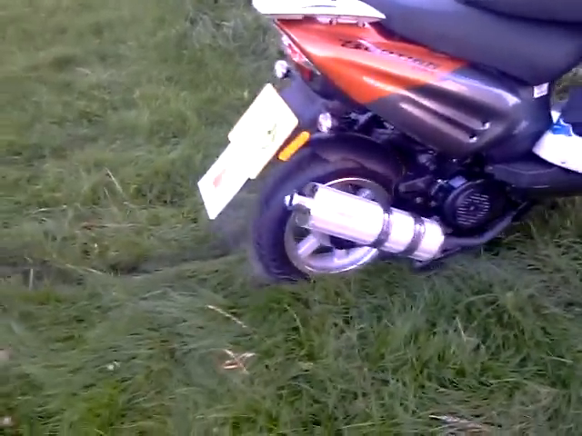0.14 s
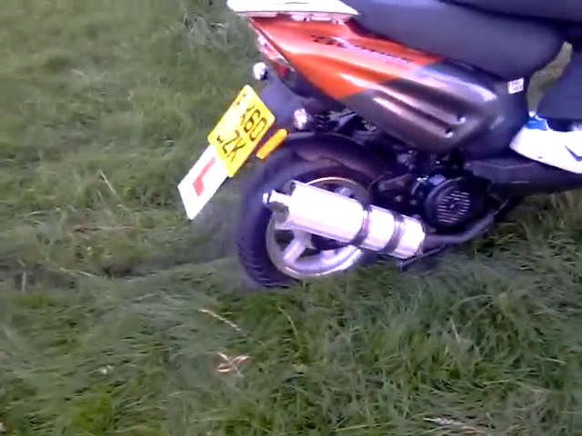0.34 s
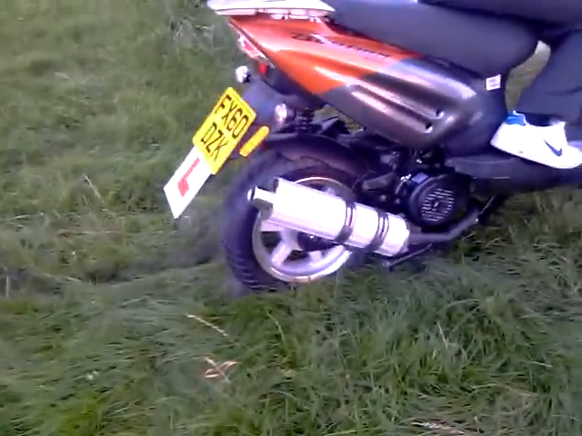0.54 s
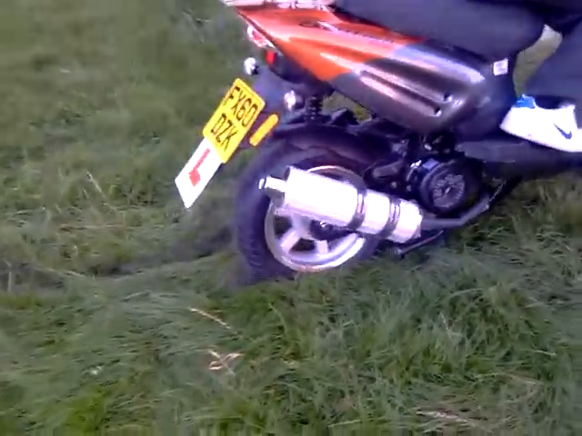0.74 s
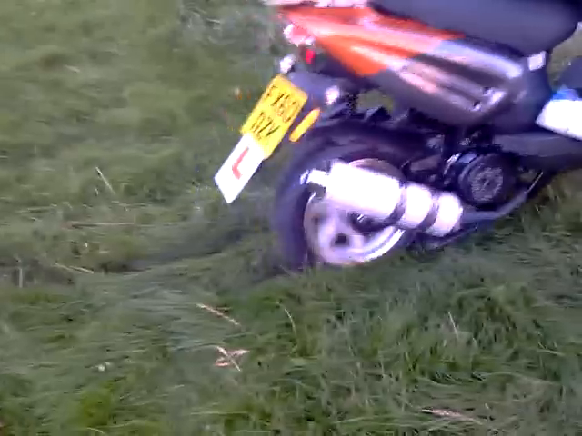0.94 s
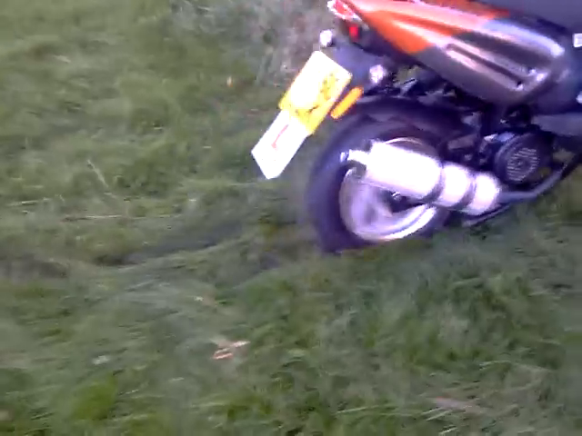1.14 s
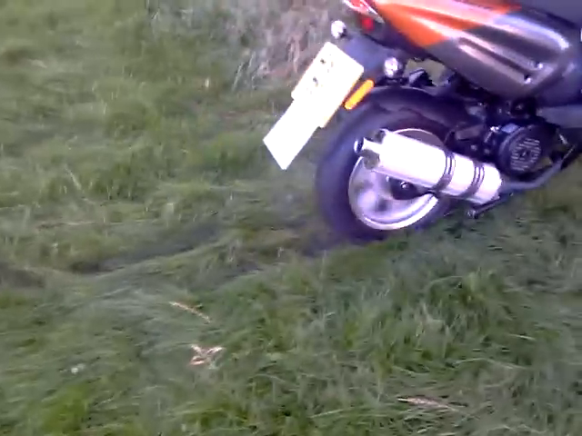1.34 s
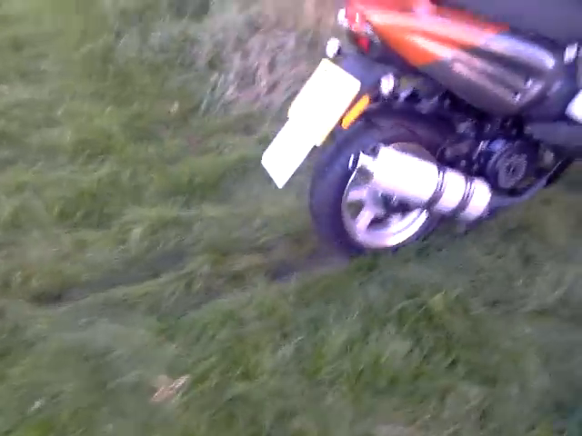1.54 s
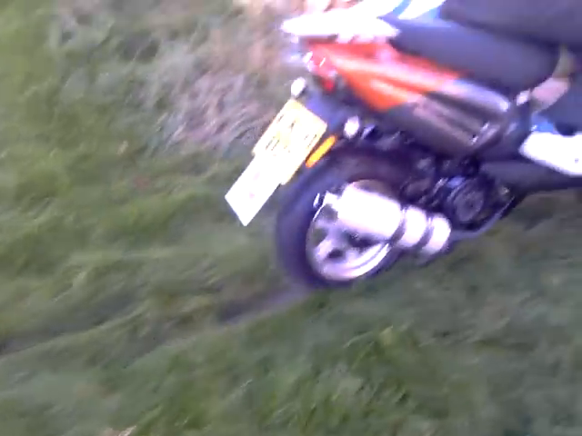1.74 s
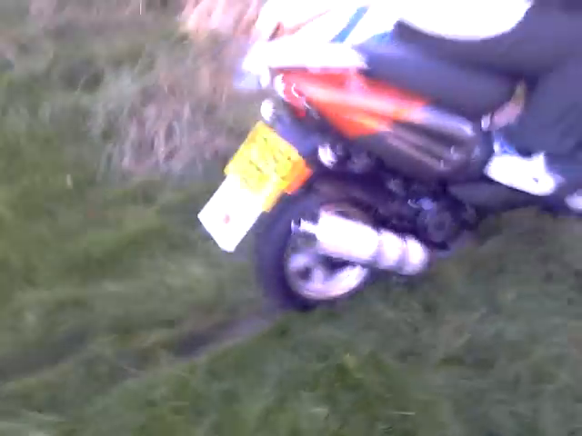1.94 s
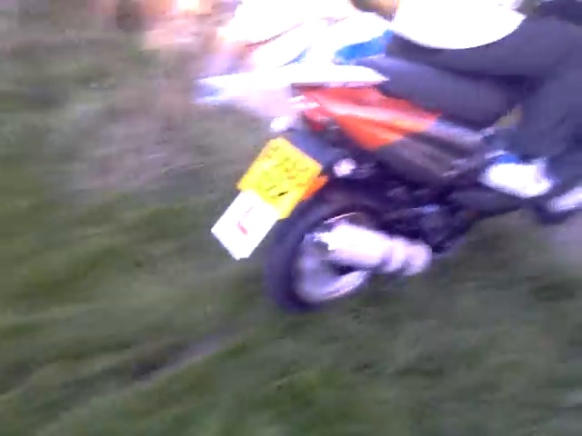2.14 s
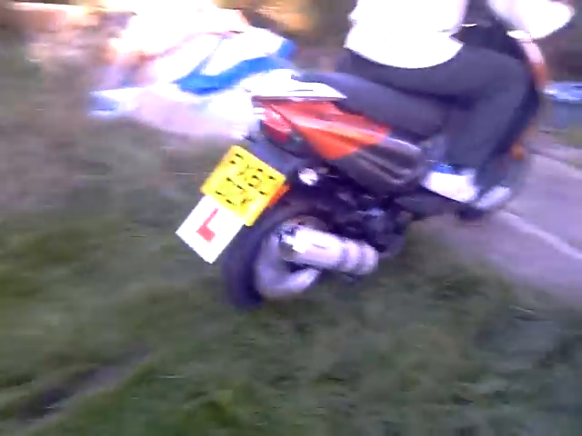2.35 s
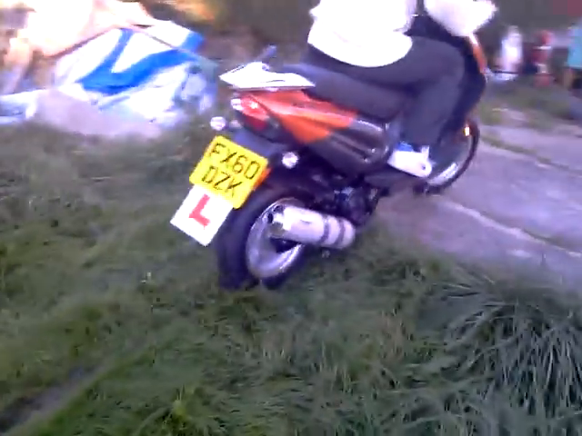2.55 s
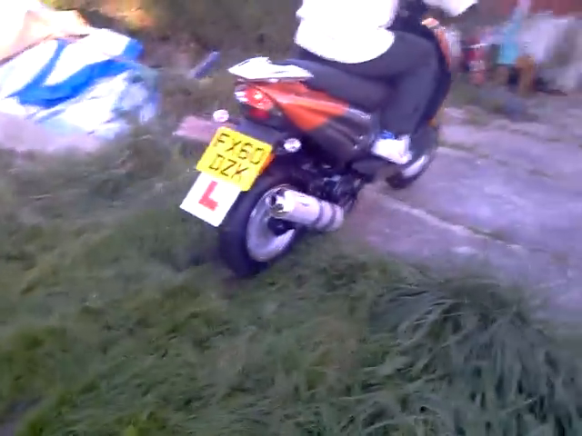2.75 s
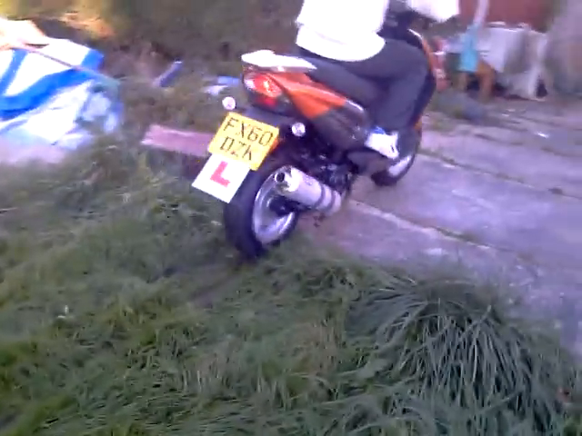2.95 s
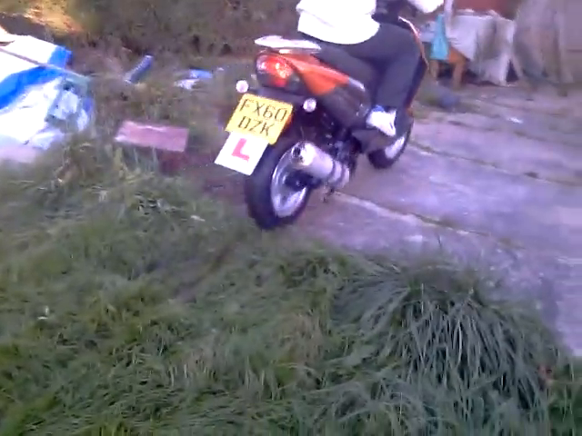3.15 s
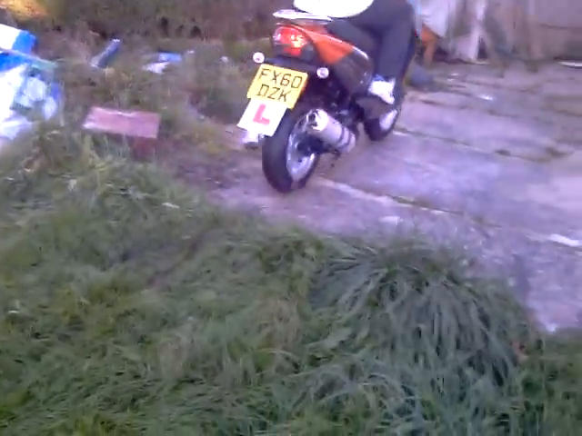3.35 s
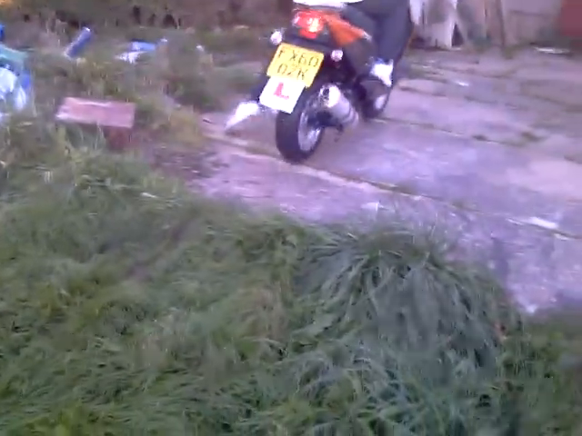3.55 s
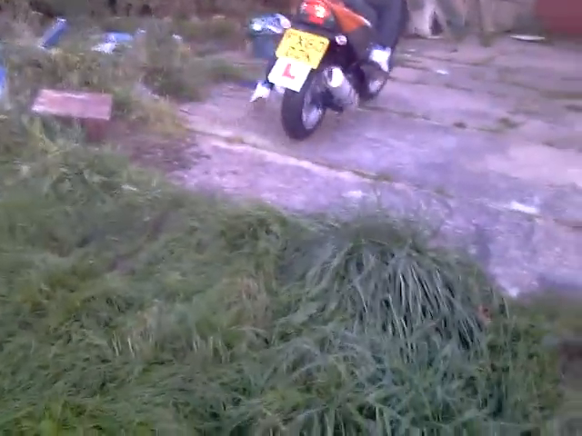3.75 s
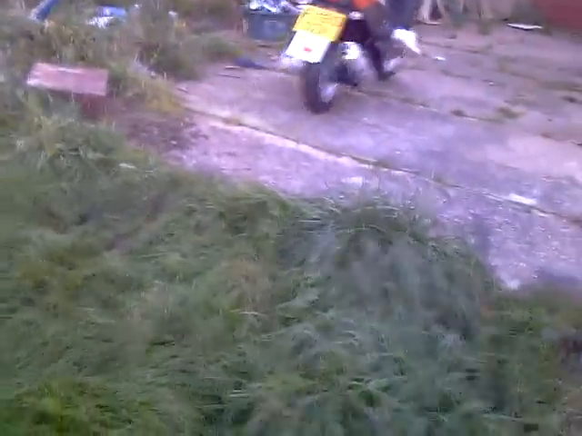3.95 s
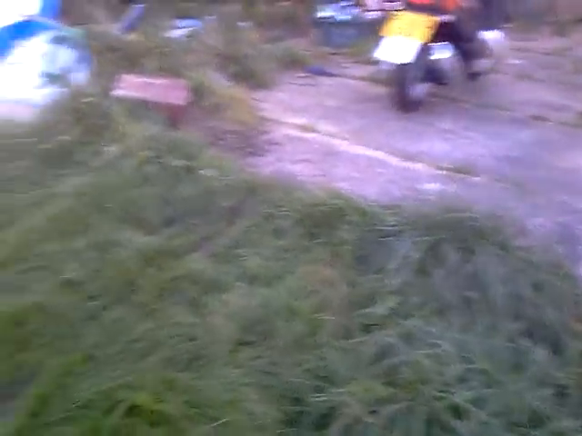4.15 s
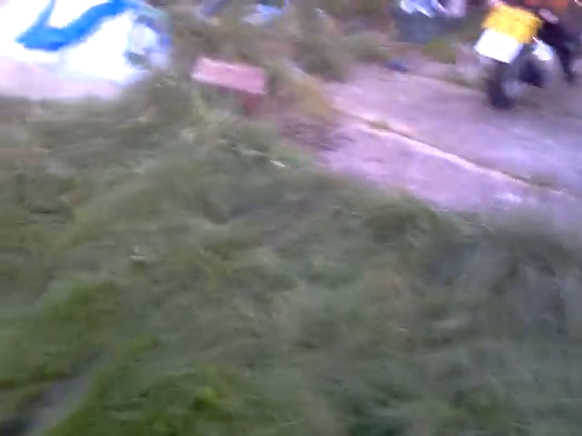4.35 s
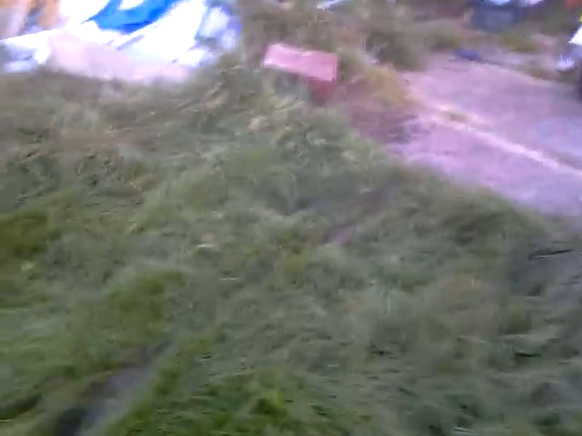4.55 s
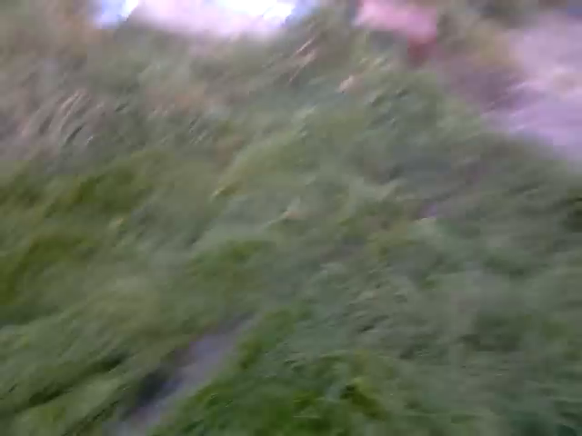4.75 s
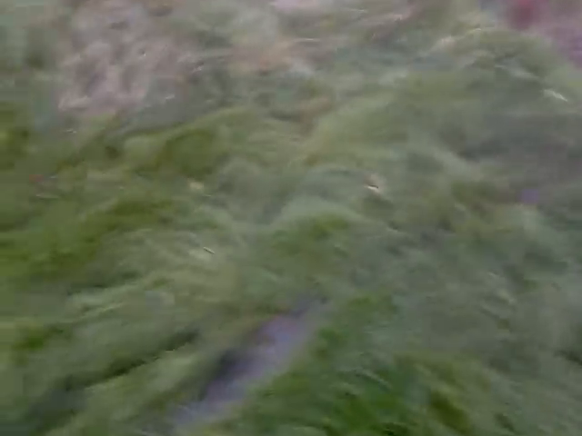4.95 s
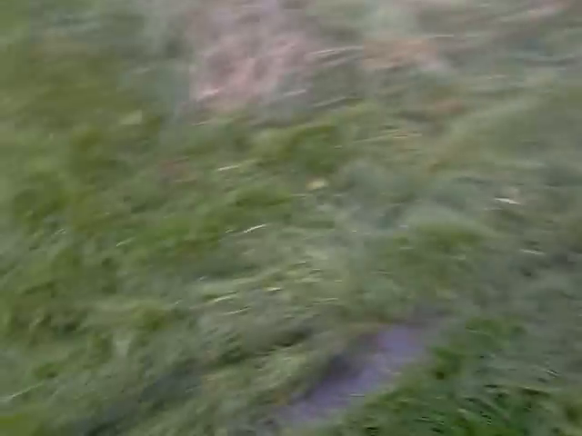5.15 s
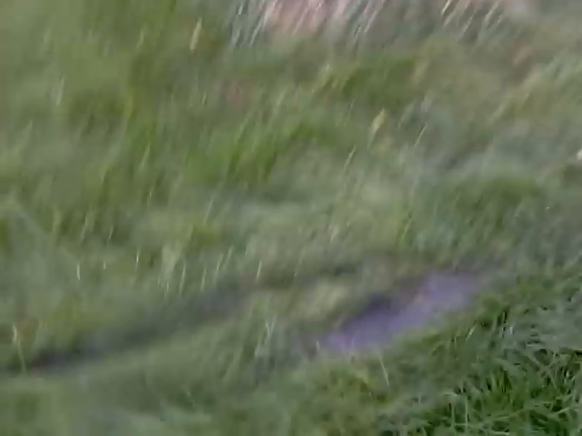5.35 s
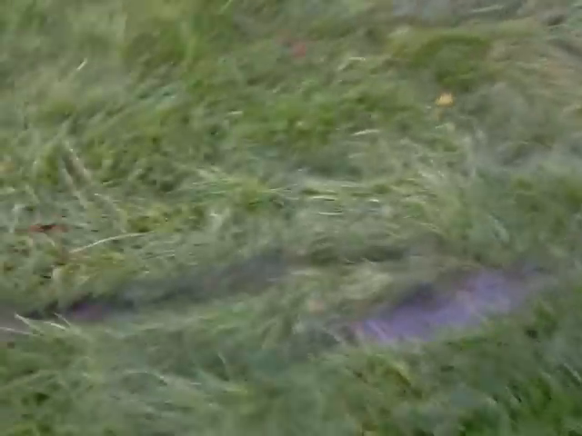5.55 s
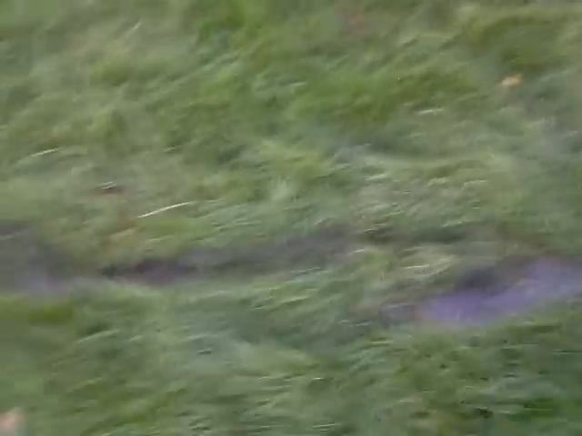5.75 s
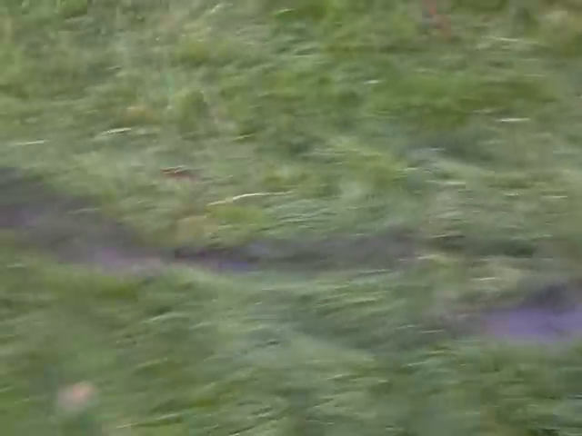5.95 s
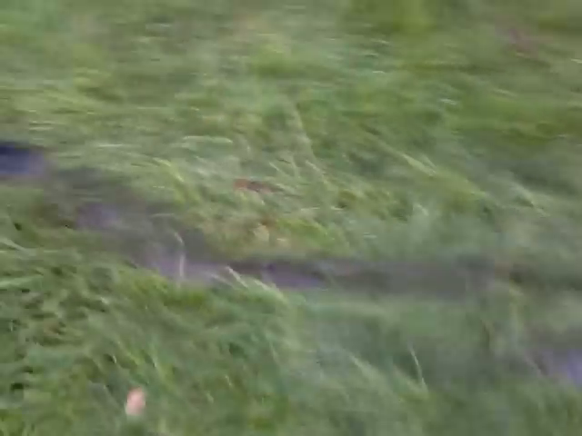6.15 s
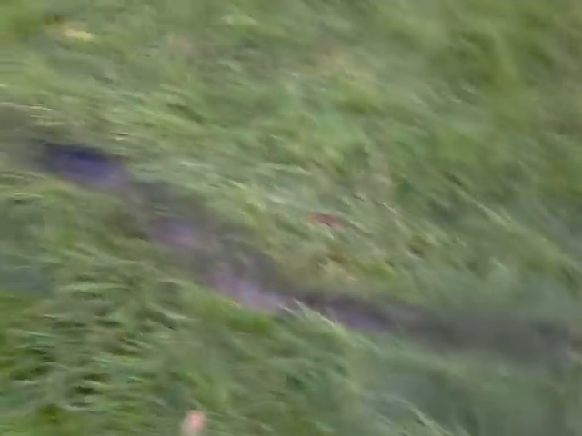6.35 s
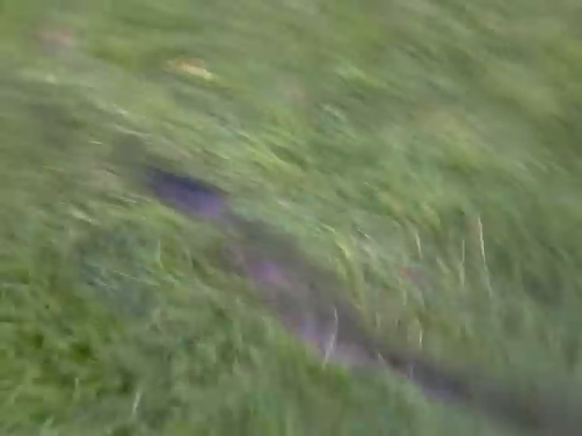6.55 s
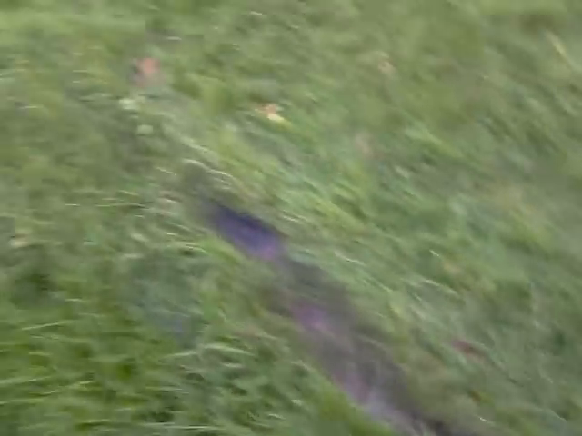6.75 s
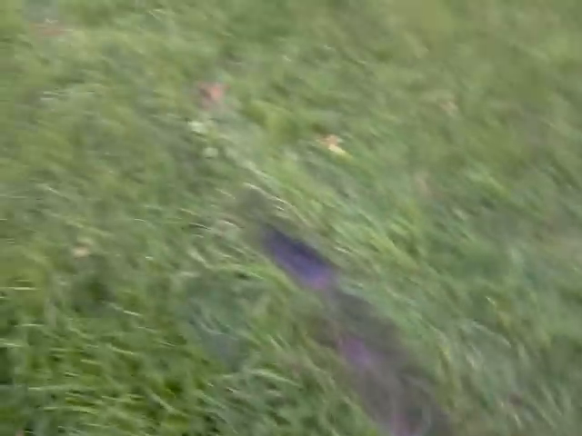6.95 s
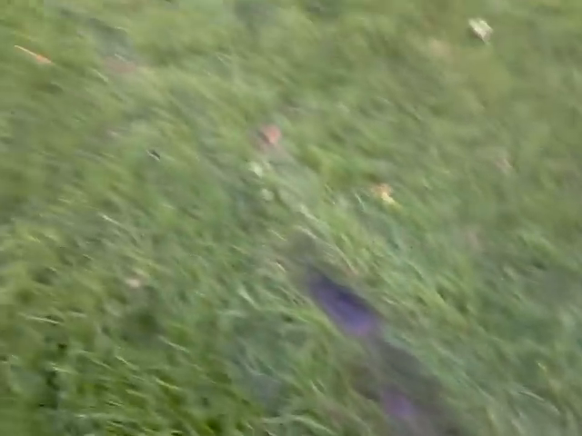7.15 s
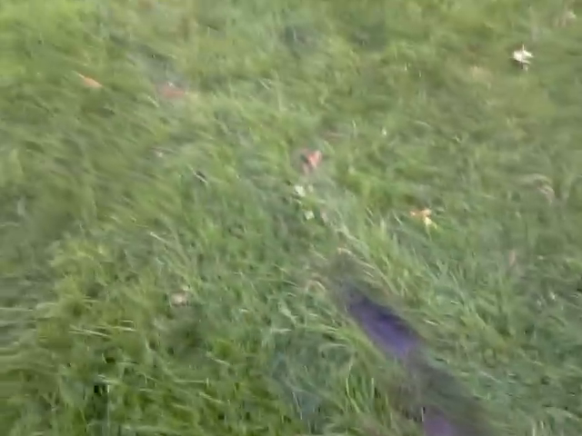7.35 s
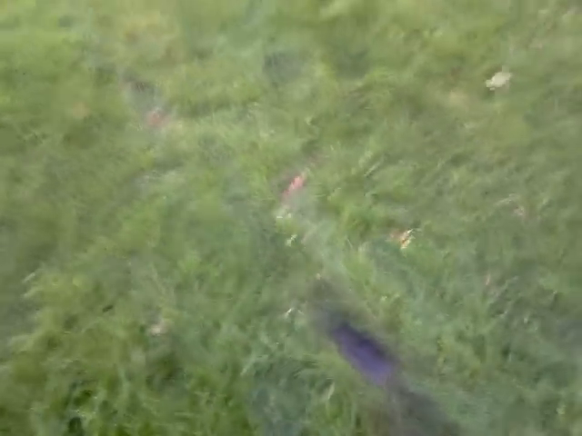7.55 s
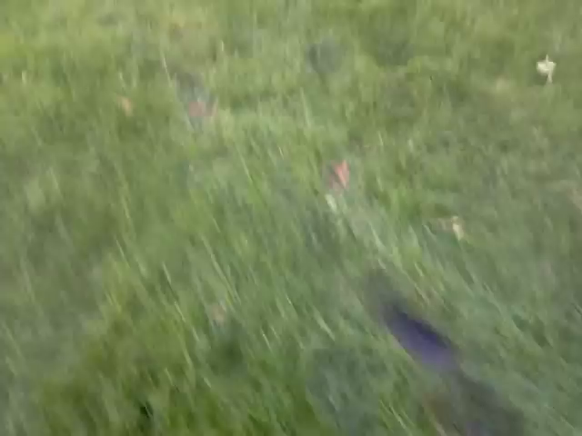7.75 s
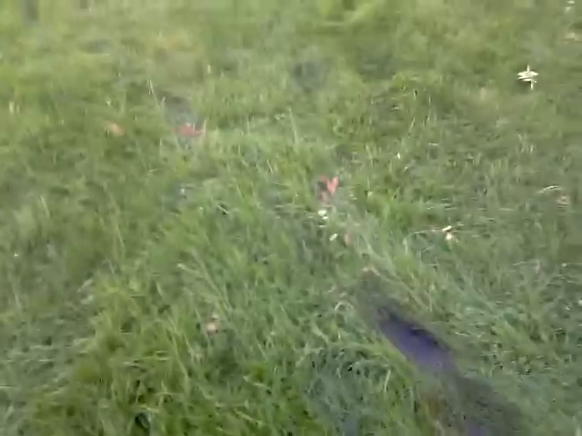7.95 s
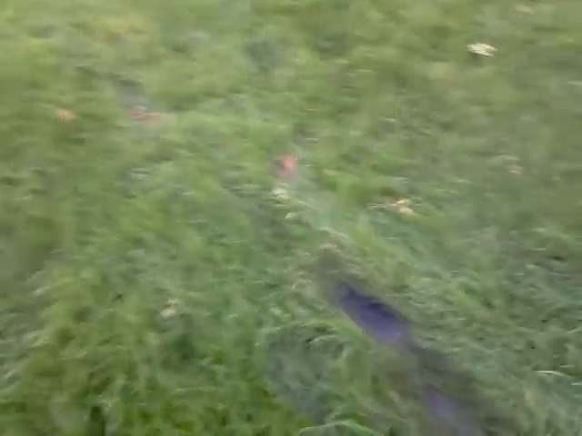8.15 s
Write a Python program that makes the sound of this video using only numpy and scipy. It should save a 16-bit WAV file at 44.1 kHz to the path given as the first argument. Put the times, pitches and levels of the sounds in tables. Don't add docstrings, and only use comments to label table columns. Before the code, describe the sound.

A small scooter engine revs hard in a garden, crackling at its loudest, then rolls away, putters at idle and is switched off.

```python
import sys
import numpy as np
from scipy import signal
from scipy.fft import rfft, irfft, next_fast_len
from scipy.io import wavfile
from scipy.ndimage import uniform_filter1d

SR = 44100
rng = np.random.default_rng(int(sys.argv[2]) if len(sys.argv) > 2 else 0)


def volts_from_decibels(level):
    exponent = np.asarray(level, float) / 20
    return 10 ** exponent


def put_to_file(sound):
    columns = np.atleast_2d(sound).T
    safe = np.clip(columns, -1, 1)
    whole_steps = np.round(safe * 32767)
    wavfile.write(sys.argv[1], SR, whole_steps.astype(np.int16))


N = 365588
T = np.arange(N) / SR


def level(x, db=0):
    return x * volts_from_decibels(db) / np.sqrt(np.mean(x ** 2))


def even(x, s=0.1):
    k = int(s * SR)
    power = uniform_filter1d(uniform_filter1d(x ** 2, k), k)
    return x / np.sqrt(power + 1e-12)


def ring(x, modes, order=1):
    out = 0
    for k, (hz, width, db) in enumerate(modes):
        y = x
        for _ in range(order):
            y = signal.lfilter(*signal.iirpeak(hz, hz / width, SR), y)
        out = out + (-1) ** k * volts_from_decibels(db) * y
    return out


def walk(rate):
    k = int(SR / rate)
    steps = np.repeat(rng.standard_normal(N // k + 1), k)
    return 1.13 * uniform_filter1d(uniform_filter1d(steps, k), k)[:N]


def fade(x, s):
    return signal.lfilter([1], [1, -np.exp(-1 / (s * SR))], x)


def lag(x, s):
    return fade(x, s) * (1 - np.exp(-1 / (s * SR)))


def strokes(turns, at, scatter_db):
    whole = np.floor(turns - at).astype(int) + 2
    strength = volts_from_decibels(scatter_db * rng.standard_normal(N // 200)[whole])
    return np.diff(whole, prepend=whole[0]) * strength


def puff(turns, at, width):
    return np.exp((np.cos(2 * np.pi * (turns - at)) - 1) / width)


# open t/s, shut t/s, firing rate gained f/Hz
REVS = [
    (.585, 1.163, 20.755),
    (1.658, 2.7094, 19.601),
    (2.305, 2.838, 15.808),
    (3.105, 3.287, 18.802),
]
# t/s, firing rate f/Hz
IDLE = [
    (0.058, 23.55),
    (0.456, 19.98),
    (1.935, 21.78),
    (3.702, 21.86),
    (5.408, 20.86),
    (6.402, 17.85),
    (6.747, 19.63),
    (7.754, 18.59),
    (8.285, 10.96),
]


def speed():
    cable_s, flywheel_s = .039, .207
    asked = sum(hz * ((T >= start) & (T < end)) for start, end, hz in REVS)
    return np.interp(T, *np.transpose(IDLE)) + lag(lag(asked, cable_s), flywheel_s)


TURN_S, TURN_LENGTH_S = 3.156, 0.67
# open t/s, shut t/s, share 0-1
THROTTLE = [(0.564, 1.145, 0.98), (1.66, 2.666, 0.86), (2.302, 2.68, 0.3), (2.732, 2.836, 0.9),
            (3.123, 3.318, 0.7)]


def filling():
    fill_s, drain_s, choke = 0.11, 0.051, 0.077
    grip = 0
    for start, end, share in THROTTLE:
        built = 1 - np.exp(-np.maximum(T - start, 0) / fill_s)
        left = np.exp(-np.maximum(T - end, 0) / drain_s)
        grip = grip + share * built * left
    return np.clip(np.maximum(grip, choke * (T < TURN_S)), 0, 1)


# f/Hz, level/dB
OPEN_PIPE = [(30, 3), (55, -1.5), (80, 4), (110, -6), (160, -0.5), (215, 4), (250, 6), (315, -1), (375, 6),
             (545, 1), (800, -9.5)]
# level/dB; even ones lead, the crank turning twice a cycle
ORDER_DB = [-12, 0, -7, -3, -11, -4, -11, -10, -13, -10, -15, -13, -14, -14, -16, -16]


def pull(turns, hz, low_hz, high_hz):
    pipe_hz, pipe_db = np.transpose(OPEN_PIPE)
    out = 0
    for k, db in enumerate(ORDER_DB, 1):
        inside = np.clip((k * hz - low_hz) / 20, 0, 1) * np.clip((high_hz - k * hz) / 20, 0, 1)
        gain = inside * volts_from_decibels(db + np.interp(k * hz, pipe_hz, pipe_db) + 1.9 * walk(4.9))
        out = out - gain * np.cos(2 * np.pi * k * turns - .45 * k ** 2)
    return even(out)


# f/Hz, width f/Hz, level/dB
IDLE_PIPE = [(179.7, 110, -2.5), (113, 124, 3.5)]
# f/Hz, width f/Hz, level/dB
BARK_PIPE = [(285, 89, -2), (361.6, 56, -0.4), (427, 29, -0.2)]
MISFIRES = [2.935, 2.986, 3.04, 3.627]


def exhaust(turns, hz, load, bark_db, turned):
    misfire_db, wall_s = -13.5, 0.01384
    lean, lean_until_s = .55, 6.24
    slowing = -uniform_filter1d(np.gradient(hz) * SR, SR // 10)
    overrun = np.clip(slowing / 30 - .2, 0, 1)
    blow = strokes(turns, 0, .9 + 2.5 * overrun)
    blow = blow * volts_from_decibels(misfire_db * sum(abs(T - s) < .5 / hz for s in MISFIRES))
    back = np.roll(blow, int(wall_s * SR))
    direct = ring(blow, IDLE_PIPE, order=3)
    wall = 0.54 * ring(back, [(188.3, 49.7, 0.0071)], order=2)
    later = 0.12 * ring(np.roll(back, SR // 90), IDLE_PIPE, order=3)
    pop = -even(direct + wall + later)
    pop = pop - lean * turned * np.clip(lean_until_s - T, 0, 1) * ring(pop, [(79, 90, 0)])
    flow = even(ring(rng.standard_normal(N), [(85, 90, -7.5), (133, 120, -8.0)], order=2))
    low_tone = pull(turns + .1, hz, low_hz=0, high_hz=259.2)
    thump = np.sqrt(1 - load) * pop + np.sqrt(load) * low_tone
    rush = rng.standard_normal(N) * (4.2 + puff(turns, 0.057, 0.74))
    gas = even(ring(rush + 40 * back, BARK_PIPE, order=2))
    high_tone = pull(turns + .1, hz, low_hz=240, high_hz=800)
    bark = np.sqrt(load) * high_tone + np.sqrt(1 - .88 * load) * gas
    return even(thump + 0.18 * flow) + volts_from_decibels(bark_db) * even(bark)


# f/Hz, width f/Hz, level/dB
AIRBOX = [(539, 140, -8.5), (720, 208, -4), (979, 366, -9)]


def intake(turns):
    air = rng.standard_normal(N) * (1.5 + puff(turns, 0.28, .8)) * volts_from_decibels(0.41 * walk(25))
    return even(ring(air, AIRBOX, order=2) + 0.09 * ring(air, AIRBOX))


# f/Hz, width f/Hz, level/dB
CASING = [(1087, 330, -5), (1424, 590, -0.02), (1882, 316, 2), (2128, 312, -0.84), (2600, 360, -0.5),
          (2960, 354, -1.1), (3300, 380, -1.25), (3730, 273, 0.5), (4225, 200, -0.5)]


def rattle(turns, hz, load):
    rasp = load * puff(turns, .95, .2) * volts_from_decibels(3.0 * walk(30))
    hits = rng.random(N) < 60 / SR
    clatter = fade(hits * volts_from_decibels(np.minimum(2.6 * rng.exponential(size=N), 13)), 0.0028)
    swell = .7 * puff(turns, 0.26, 0.48)
    noise = rng.standard_normal(N) * (1.7 + swell + 0.88 * rasp + 0.2 * clatter)
    valves = 15 * strokes(turns, .69, 3.4) + 10 * strokes(turns, 0.18, 6.1) + 10 * strokes(turns, 0.26, 5.0)
    taps = (1 - 0.23 * load) * valves
    casing = 0
    for k, mode in enumerate(CASING):
        casing = casing + (-1) ** k * volts_from_decibels(1.33 * walk(12)) * ring(noise + taps, [mode])
    return even(even(casing) + 1.4 * chuff(turns, hz, load))


# f/Hz, level/dB per Hz
GARDEN = [(15, -37), (25, -14.5), (351, -39), (415, -15.5), (492, -24), (988, -30), (1100, -29.5),
          (3360, -48), (3900, -53), (5070, -76), (8580, -120)]
GARDEN_DB = -42


def garden():
    hz, db = np.transpose(GARDEN)
    murmur = 0
    for f in 28 * 2 ** np.arange(0, 7.2, .5):
        gain = volts_from_decibels(np.interp(np.log(f), np.log(hz), db) + 1.1 * walk(6.4))
        murmur = murmur + gain * ring(rng.standard_normal(N), [(f, f / 1.33, 0)], order=2)
    return level(murmur, GARDEN_DB - 4.0)


# t/s, peak level/dB, low f/Hz, high f/Hz, t60/s
TICKS = [(1.074, -5.5, 863, 1500, .03), (1.7787, -14, 1270, 3200, .015), (6.335, -32, 344, 552, 0.13),
         (8.28, -37.5, 2140, 3300, 0.034), (2.236, -5.5, 1337, 1550, 0.022),
         (4.367, -28.5, 2690, 2960, 0.11), (4.435, -31, 2600, 2640, 0.032),
         (4.621, -33.5, 2600, 2750, 0.012), (4.726, -20, 3120, 3500, 0.031),
         (7.7115, -17, 1110, 2460, 0.0046), (7.8009, -24.5, 346, 602, 0.0089),
         (7.813, -17.5, 1330, 3300, 0.0083), (7.867, -30, 1580, 2960, 0.013)]
# t/s, peak level/dB
CRACKS = [(2.5485, -3), (2.557, -1.5), (2.588, -1.5), (2.607, 3), (2.6225, 0), (2.626, 1), (2.6415, .5),
          (2.645, 1), (2.663, -.5), (2.697, -4), (2.703, 1)]
# low f/Hz, high f/Hz, t60/s
CRACK = (1400, 2300, .007)
# t/s, peak level/dB, f/Hz
THUDS = [(0.05, -38, 71), (4.541, -34, 44.8), (4.71, -31.5, 69.8)]


def knocks():
    out, t = np.zeros(N + SR), np.arange(SR // 8) / SR
    for s, db, low_hz, high_hz, t60 in TICKS + [row + CRACK for row in CRACKS]:
        modes = -np.sin(2 * np.pi * low_hz * t) - np.sin(2 * np.pi * high_hz * t)
        crack = modes + 0.71 * rng.standard_normal(len(t))
        out[int(s * SR):][:len(t)] += volts_from_decibels(db) / 2 * crack * np.exp(-np.log(1000) * t / max(t60, .004))
    for s, db, hz in THUDS:
        out[int(s * SR):][:len(t)] += volts_from_decibels(db) * np.sin(2 * np.pi * hz * t) * np.exp(-t / 0.011)
    return out[:N]


def chuff(turns, hz, load):
    lugging = np.clip(load / .3 - .3, 0, .7) * np.clip((39 - hz) / 9, 0, 1)
    first = strokes(turns, .03, 1.5)
    second = 0.6 * strokes(turns, 0.25, 2.0)
    spit = rng.standard_normal(N) * fade(first + second, .003)
    bright = even(ring(spit, [(2340, 330, -2.0), (3500, 770, -1)]))
    suction = uniform_filter1d(uniform_filter1d(np.roll(first, SR // 500), SR // 400), SR // 400)
    rebound = fade(suction, .008) / (0.0095 * SR)
    return lugging * (bright - 0.23 * even(suction - rebound))


# start t/s, end t/s, f/Hz, level/dB
PANEL = [(3.77, 5.297, 718.8, -43.5), (5.303, 5.9, 698, -51.5), (6.542, 7.836, 680, -50)]


def panel(turns):
    start, end, hz, _ = np.transpose(PANEL)
    slow = signal.butter(2, 38, fs=SR, output="sos")
    sway = signal.sosfilt(slow, rng.standard_normal((2, N)))
    spin = 2 * np.pi * np.cumsum(np.interp(T, (start + end) / 2, hz)) / SR
    hum = sway[0] * np.cos(spin) + sway[1] * np.sin(spin)
    hum = hum * (0.77 + puff(turns, .85, 0.94))
    loudness = sum(volts_from_decibels(d) * ((T >= a) & (T < b)) for a, b, _, d in PANEL)
    return even(hum) * lag(loudness, 0.14)


# loudest t/s, level/dB
SQUEAK = [(3.98, -31), (4.17, -36)]


def squeak(turns):
    squeak_hz, rise_db_per_s, fall_db_per_s = 3630, 88, 115
    rub = strokes(2 * turns, 0.065, 4.2)
    rub = rub + 0.04 * rng.standard_normal(N) * puff(2 * turns, 0.53, 0.35)
    grip = 0
    for s, db in SQUEAK:
        before, after = np.maximum(s - T, 0), np.maximum(T - s, 0)
        grip = grip + volts_from_decibels(db - rise_db_per_s * before - fall_db_per_s * after)
    return even(ring(rub, [(squeak_hz, 110, 0)], order=2)) * grip


# level/dB at 20 Hz, dB per octave of speed, dB at full filling, dB once tail-on,
# share of distance loss
LAYERS = [
    (-33.5, 5.5, 7, 1.5, 0.64),
    (-48, 9, 12, -0.5, .3),
    (-38.5, 10, 4, -4.5, 0.93),
    (-34.5, 13.5, 2.5, 0, 1.58),
]
# t/s, distance/m
DISTANCE = [(0, 2.02), (2.6, 2.11), (3.05, 2.62), (3.3, 2.24), (3.6, 2.86), (4.1, 2.54), (4.6, 3.17),
            (5.5, 3.26), (6.4, 4.3), (7.3, 5.8), (8.29, 5.8)]


def scene():
    key_off_s, key_off_db, die_db_per_s, unfired_db = 7.9, 1.5, -42, -5.5
    engine_top = .52
    hz, load = speed(), filling()
    turns = np.cumsum(hz) / SR + 2 - .435 + 0.0039 * walk(15)
    turned = np.clip((T - TURN_S) / TURN_LENGTH_S, 0, 1)
    loss_db = -20 * np.log10(np.interp(T, *np.transpose(DISTANCE)) / 2)
    off = T > key_off_s
    off_db = off * (key_off_db + die_db_per_s * (T - key_off_s))
    octaves = np.log2(np.maximum(hz, 20) / 20)
    thump_db, bark_db, intake_db, rattle_db = (
        idle + rev * octaves + full * load + tail * turned + far * loss_db
        for idle, rev, full, tail, far in LAYERS)
    bark_over_thump_db = bark_db - thump_db - off_db / 2
    engine = volts_from_decibels(thump_db + off_db + unfired_db * off) * exhaust(turns, hz, load, bark_over_thump_db, turned)
    engine = engine + volts_from_decibels(intake_db + off_db / 2) * intake(turns)
    engine = engine + volts_from_decibels(rattle_db + off_db) * rattle(turns, hz, load)
    engine = np.clip(engine, -engine_top, engine_top)
    return (engine + panel(turns) + squeak(turns) + knocks() + garden())[None]


def band_limit(x):
    return signal.sosfilt(signal.butter(12, 16000, fs=SR, output="sos"), x)


# f/Hz, level/dB
PHONE = [(10, -18.5), (30, -1), (3500, 1), (3770, -10), (3980, -26), (4280, -25.5), (4400, -31.5),
         (4480, -57), (4560, -103), (22050, -120)]


def record(dry):
    size = next_fast_len(N)
    hz, db = np.transpose(PHONE)
    band = volts_from_decibels(np.interp(np.arange(size // 2 + 1) * SR / size, hz, db))
    x = irfft(rfft(dry, size) * band, size)[:, :N]
    return band_limit(np.clip(x, -.71, .71))


dry = scene()
out = record(dry)
put_to_file(out)
```